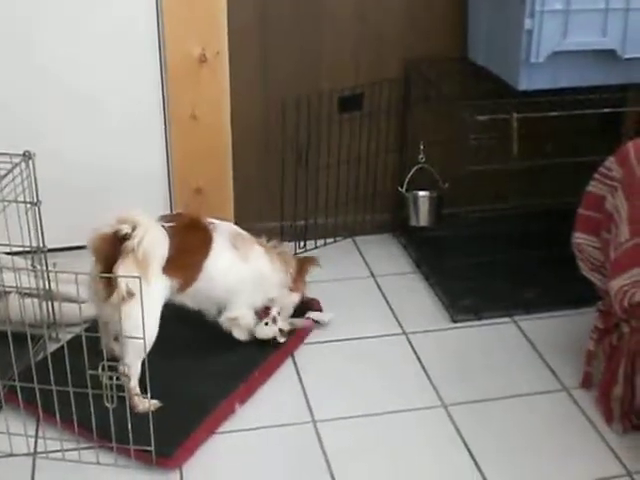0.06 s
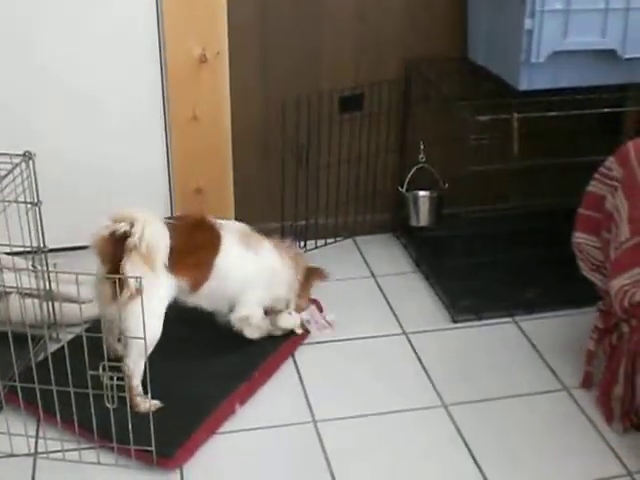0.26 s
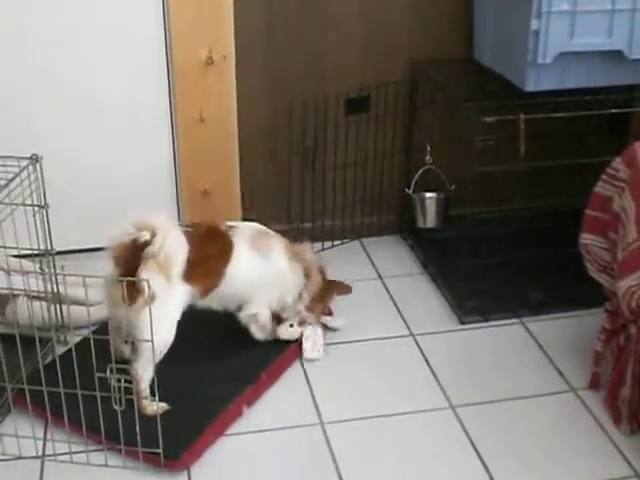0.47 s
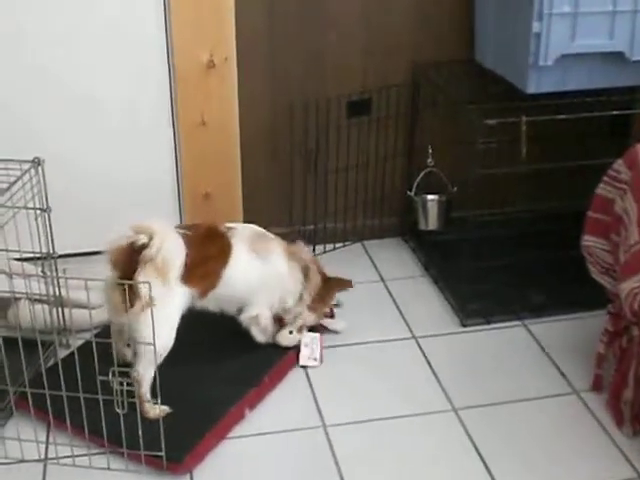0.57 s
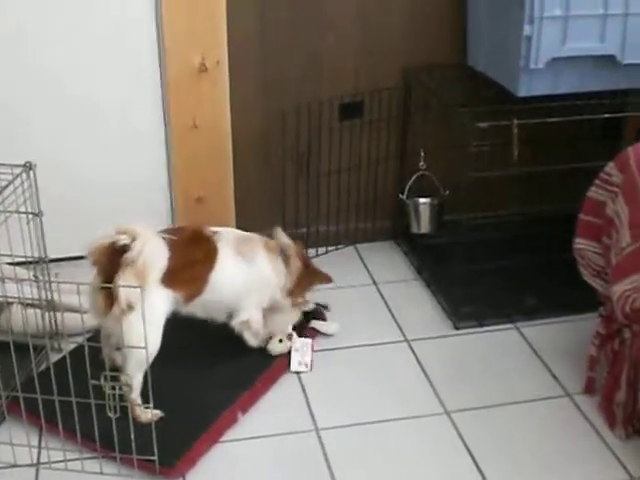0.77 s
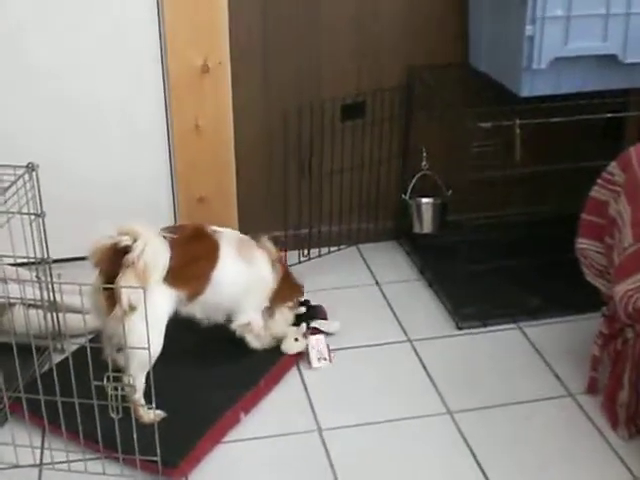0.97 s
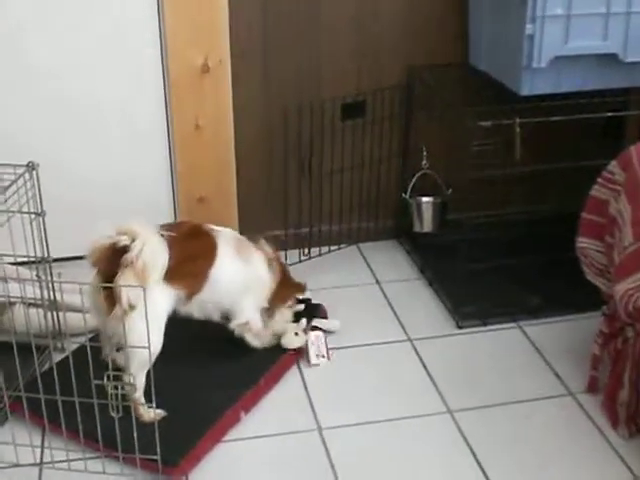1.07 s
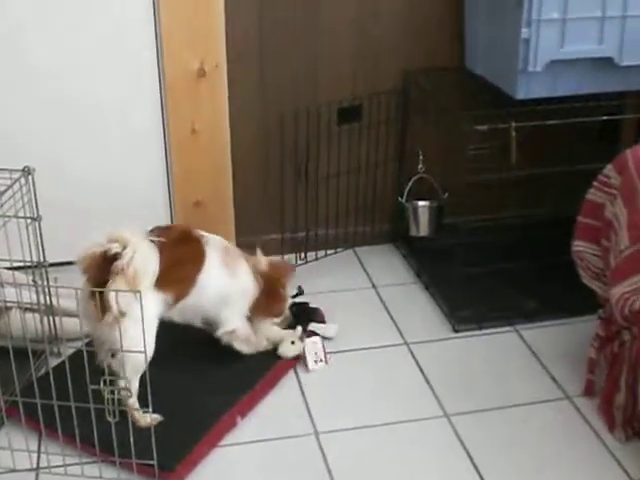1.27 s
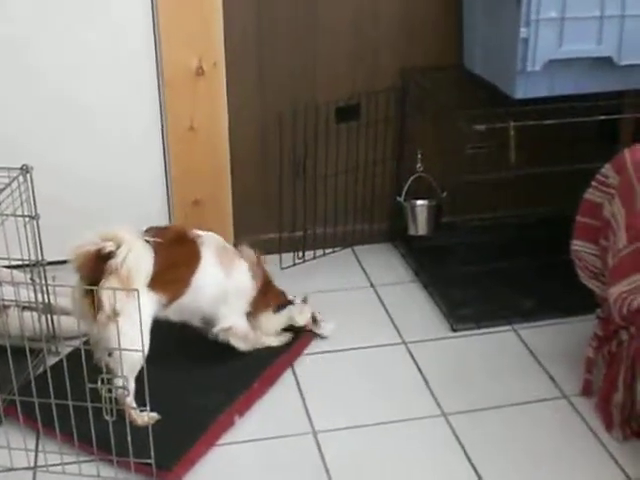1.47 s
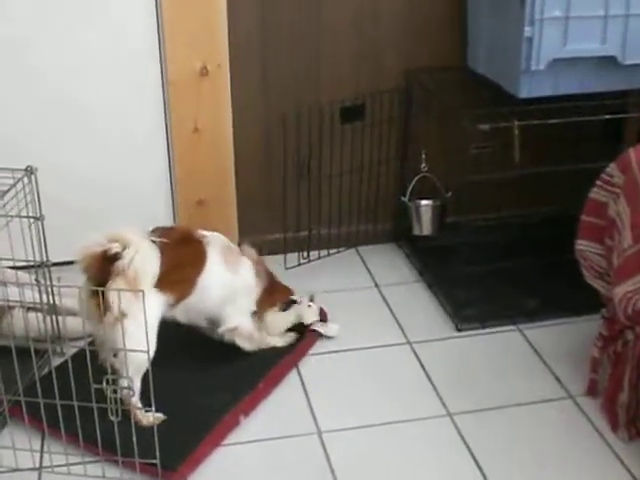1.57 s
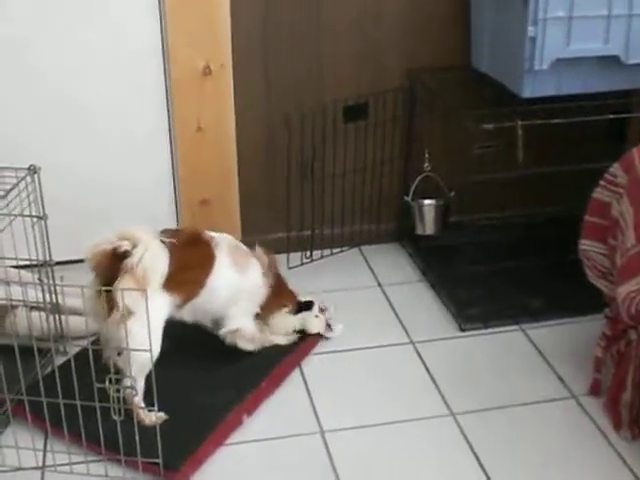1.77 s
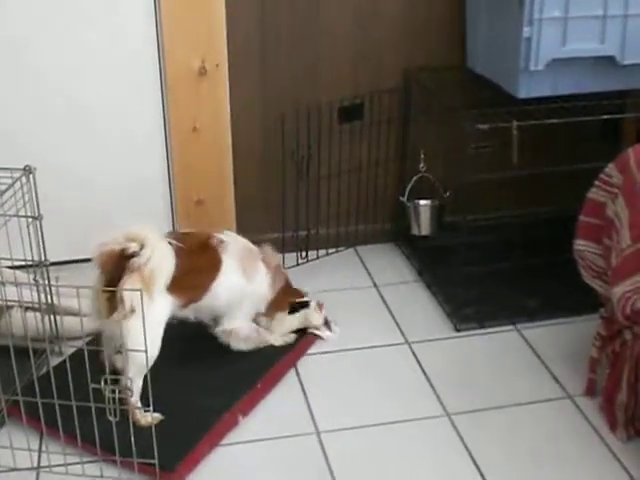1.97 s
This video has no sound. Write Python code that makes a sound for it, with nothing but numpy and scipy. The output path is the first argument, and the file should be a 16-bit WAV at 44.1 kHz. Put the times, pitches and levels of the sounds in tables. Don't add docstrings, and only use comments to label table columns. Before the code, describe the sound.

A squeaky toy gives short high chirps and brief squeezed squeaks in a hard tiled room

```python
import sys
import numpy as np
from scipy import signal
from scipy.fft import rfft, irfft
from scipy.io import wavfile
from scipy.ndimage import uniform_filter1d

SR = 44100
rng = np.random.default_rng(int(sys.argv[2]) if len(sys.argv) > 2 else 0)


def generate_wav(signal):
    frames = np.transpose(np.atleast_2d(signal))
    scaled = np.clip(frames, -1, 1) * 32767
    pcm = np.round(scaled).astype(np.int16)
    wavfile.write(sys.argv[1], SR, pcm)


def level_to_linear(level):
    exponent = np.asarray(level, float) / 20
    return 10 ** exponent


N = 89258


def evened(x):
    return x / np.sqrt(np.mean(x ** 2) + 1e-20)


def read(points, hz):
    f, value = np.transpose(points)
    return np.interp(np.log(hz + 1), np.log(f + 1), value)


def add(mix, s, sound):
    part = mix[round(s * SR):][:len(sound)]
    part += sound[:len(part)]


def band(x, hz, width_hz):
    r = np.exp(-np.pi * width_hz / SR)
    return signal.lfilter([1 - r, 0, r - 1], [1, -2 * r * np.cos(2 * np.pi * hz / SR), r * r], x)


def squeak(curve, voice):
    # (frequency [Hz],
    # gain [dB])
    toy_body = [(800, 2.5), (1300, -1), (2400, -1.5), (4000, -1), (6800, 0.5), (8700, -11.5), (10300, -15),
                (15500, -12)]
    steady_wobble, glide_wobble_s, air_share = .0015, .00022, .07
    ring_hz, lag_s, close_s = 2000, .0003, .002

    s, hz, db = np.transpose(curve)
    t = np.arange(s[0], s[-1], 1 / SR)
    shake, air = rng.standard_normal((2, 6000))[:, :len(t)]

    pitch = np.interp(t, s, hz)
    unrest = steady_wobble + glide_wobble_s * abs(np.gradient(np.log(pitch))) * SR
    pitch = pitch * (1 + unrest * evened(uniform_filter1d(shake, size=60)))
    turns = np.cumsum(pitch) / SR

    body, edge, whistle, top, bite_db = voice
    colour = np.array(toy_body)
    colour = colour + np.outer([body, body, 0, 0, edge, whistle, top, top], [0, 1])
    k = np.arange(1, 21)[:, None]
    partial_hz = k * pitch
    gain = level_to_linear(read(colour, partial_hz)) * (partial_hz < SR / 2.6)
    lag = np.arctan(partial_hz / ring_hz)
    lag = lag + 2 * np.pi * lag_s * partial_hz ** 2 / ring_hz / 10
    beats = (gain * np.cos(2 * np.pi * k * (turns - 1) - lag)).sum(0)
    beats = beats / np.sqrt((gain ** 2).sum(0) / 2)

    puffs = evened(band(air, 2400, 4300)) * (1 + np.cos(2 * np.pi * turns))
    closing = np.minimum((s[-1] - t) / close_s, 1)
    return s[0], closing * level_to_linear(np.interp(t, s, db) + bite_db) * (beats + air_share * puffs)


def toy():
    # (time [s], reed pitch [Hz], level [dB])
    chirps = [
        [(.2505, 1210, -41), (.2535, 1284, -30.5), (.2555, 2315, -24.5), (.258, 3250, -34.5),
         (.2595, 3700, -45)],
        [(.339, 4327, -48), (.345, 3521, -34), (.352, 2289, -26.5), (.358, 1328, -32), (.364, 893, -34.5),
         (.372, 769, -35.5), (.376, 765, -46)],
        [(.5675, 880, -41), (.571, 930, -38), (.579, 945, -40), (.584, 890, -42), (.59, 760, -50)],
        [(1.3671, 1056, -43), (1.3712, 1165, -24.5), (1.374, 1824, -26), (1.378, 2593, -23.5),
         (1.381, 3230, -29.5), (1.383, 3660, -62)],
        [(1.5765, 3480, -43), (1.579, 2200, -38.5), (1.582, 1020, -39), (1.584, 900, -34)],
    ]
    # (time [s], reed pitch [Hz], level [dB])
    squeezes = [
        [(1.585, 900, -40), (1.591, 1045, -33), (1.597, 1083, -31), (1.606, 1062, -31), (1.617, 1024, -31),
         (1.63, 1038, -32), (1.644, 1100, -30), (1.649, 1080, -27), (1.661, 790, -36)],
        [(1.9405, 850, -36), (1.948, 866, -35), (1.96, 931, -33), (1.972, 1045, -30), (1.986, 1150, -27),
         (1.991, 1300, -25), (2.001, 1950, -27), (2.006, 2700, -34), (2.011, 3000, -55)],
    ]
    # (hollow body [dB], edge [dB], whistle [dB], top [dB], bite level [dB])
    voices = [(3.5, 1.5, 4.5, -3.3, -0.2), (1.5, 2, -8, -4, 1.54), (3, -13, 3, -1, -3.5),
              (5, 1.5, 0.5, -1.5, -2.46), (4, -1, 3, 0, 8.2), (5, -9.5, 9.5, 3, -1), (2, 6.5, 7, 0.5, 2.63)]
    out = np.zeros(N)
    for curve, voice in zip(chirps + squeezes, voices):
        add(out, *squeak(curve, voice))
    return out


def tags():
    # (time [s], peak level [dB], low ring [dB], middle ring [dB], high ring [dB])
    knocks = [(.108, -60, -25, -11, 8), (.195, -56, -13, -13, -15), (0.208, -53, -16, -12, 0),
              (0.233, -51, -5, -20, -7), (.268, -54, -25, 9, -9), (0.329, -54, -23, -15, 11),
              (.359, -31, -25, -17, -14), (0.403, -49, -25, -15, 4), (0.576, -46, -3, -22, -15),
              (0.9325, -56, -6, -12, -15), (0.935, -54, 12, 9, 8)]
    # (frequency [Hz], pair splitting [Hz], decay time t60 [s])
    tag_modes = [(8800, 400, .035), (12870, 25, .18), (13490, 55, .14)]
    out, t = np.zeros(N), np.arange(SR // 3) / SR
    for s, db, *ring_levels in knocks:
        ring = 0
        for (hz, split_hz, t60), ring_db in zip(tag_modes, ring_levels):
            beating = (1 + np.cos(2 * np.pi * split_hz * t)) / 2
            ring = ring + level_to_linear(ring_db - 60 * t / t60) * np.sin(2 * np.pi * hz * t) * beating
        noise = evened(band(rng.standard_normal(len(t)), 7300, 8600))
        tick = level_to_linear(1 - 60 * t / 0.022) * noise
        add(out, s, level_to_linear(db) * (ring + tick))
    return out


def thuds():
    # (time [s], peak level [dB], centre frequency [Hz], rise time [s], decay time
    # t60 [s])
    soft_contacts = [(.542, -44.5, 500, 0.002, 0.06), (.585, -45, 720, 0.005, 0.056),
                     (.17, -60, 1600, 0.033, 0.12), (1.82, -63, 12000, 0.068, 0.096),
                     (.878, -59, 5600, .008, .05), (1.228, -62, 11500, .01, .07), (.14, -63, 6500, .008, .05),
              (1.14, -64, 2500, .03, .3), (1.225, -63, 4000, .015, .1)]
    out, t = np.zeros(N), np.arange(SR // 3) / SR
    for s, db, hz, rise, t60 in soft_contacts:
        puff = band(rng.standard_normal(len(t)), hz, .7 * hz)
        puff = evened(band(puff, hz, .7 * hz))
        decay = level_to_linear(db - 60 * np.maximum(t - rise, 0) / t60)
        add(out, s, decay * np.minimum(t / rise, 1) * puff)
    return out


def room(x):
    # (frequency [Hz], t60 [s])
    reverb_times = [(500, 0.37), (1300, 0.57), (3500, 0.64), (7000, 0.58), (12000, 0.49)]
    # (delay [s], level [dB])
    reflections = [(.0017, -33.5), (.0021, -14.5), (.0026, -11.5), (.003, -16), (.0036, -10), (.0047, -9),
                   (.0064, -12), (.0141, -12), (.0345, -12)]
    # (frequency [Hz], level thrown back [dB])
    wall_gain = [(700, 2.5), (3000, -1), (7000, -2.5), (9000, -6), (12000, -3.5), (15500, -11)]

    taps = np.zeros(SR)
    at = np.arange(260, SR - 20, 20)
    taps[at + rng.integers(0, 20, len(at))] = rng.choice([-1., 1.], len(at))
    hz, t, z = signal.stft(taps, SR, nperseg=256)
    decay = level_to_linear(-60 * t / read(reverb_times, hz)[:, None])
    tail = signal.istft(z * decay, SR, nperseg=256)[1]
    tail *= np.minimum(np.arange(len(tail)) / SR / 0.0067, 1)
    tail *= level_to_linear(2.5) / np.linalg.norm(tail)
    for s, db in reflections:
        add(tail, s, level_to_linear([db]))

    dull = irfft(rfft(x) * level_to_linear(read(wall_gain, np.fft.rfftfreq(N, 1 / SR))), N)
    return signal.fftconvolve(dull, tail)[:N]


def floor():
    # (frequency [Hz], density [dB per Hz])
    hiss_density = [(30, -6), (60, -9), (100, -3), (200, 1.5), (400, -2), (1000, -6), (5000, -16),
                    (16000, -19.5)]
    # (frequency [Hz], rms level [dB])
    tones = [
        (60, -76.5),
        (120, -59),
        (14505, -67),
    ]
    hz, t = np.fft.rfftfreq(N, 1 / SR), np.arange(N) / SR
    hiss = irfft(rfft(rng.standard_normal(N)) * level_to_linear(read(hiss_density, hz)), N)
    out = level_to_linear(-55) * evened(hiss)
    for f, db in tones:
        out += np.sqrt(2) * level_to_linear(db) * np.sin(2 * np.pi * f * t)
    return out


def scene():
    near = toy() + tags() + thuds()
    return (near + room(near) + floor())[None]


def top_cut(x):
    return signal.sosfilt(signal.butter(12, 16450, fs=SR, output="sos"), x)


def record(dry):
    duck_from_db, duck_share, recover_db_per_s = -20, 0.038, 99
    power_db = 10 * np.log10(abs(uniform_filter1d(dry[0] ** 2, size=400)) + 1e-12)
    fall = np.arange(N) * recover_db_per_s / SR
    held_db = np.maximum.accumulate(power_db + fall) - fall
    over_db = np.maximum(held_db - duck_from_db, 0)
    ducked = dry / level_to_linear(duck_share * uniform_filter1d(over_db, size=200))
    low_pass = signal.firwin(255, 15600, window=("kaiser", 5), fs=SR)
    mix = signal.oaconvolve(ducked, low_pass[None], "same")
    return top_cut(mix)


dry = scene()
out = record(dry)
generate_wav(out)
```